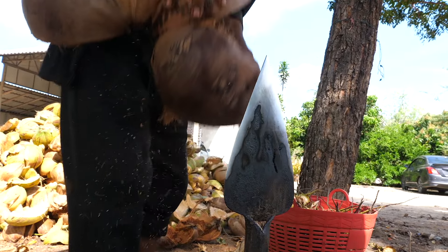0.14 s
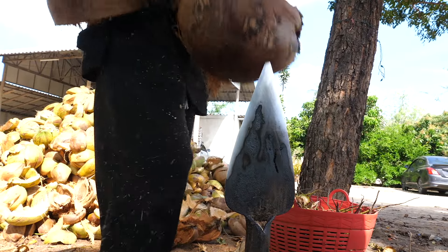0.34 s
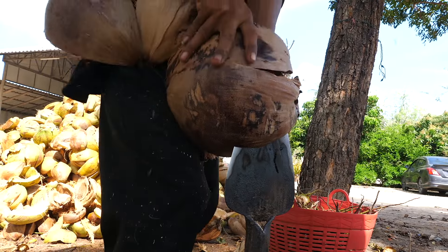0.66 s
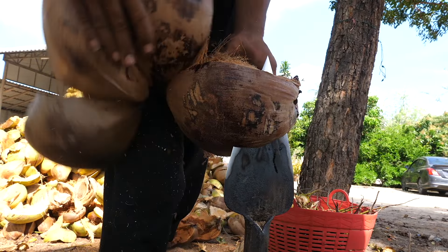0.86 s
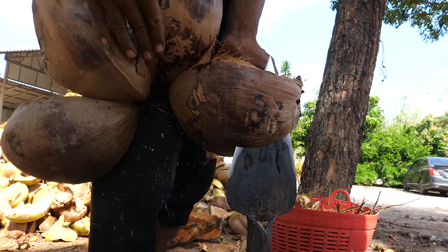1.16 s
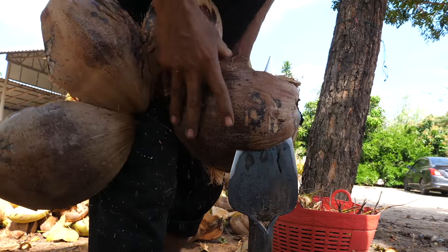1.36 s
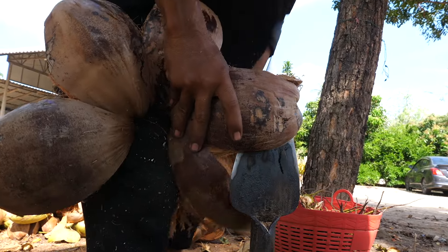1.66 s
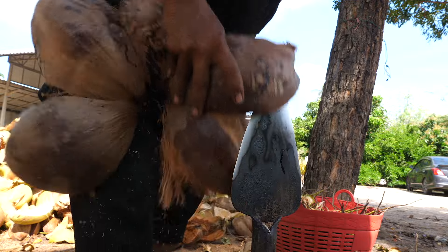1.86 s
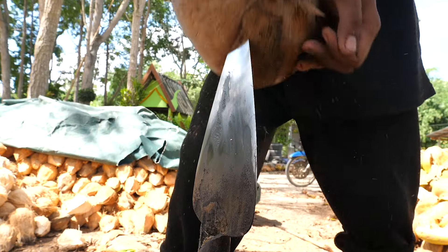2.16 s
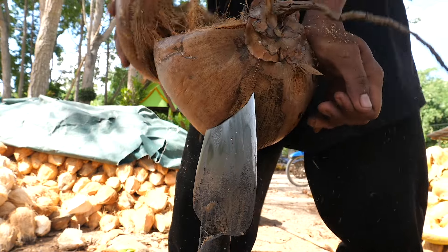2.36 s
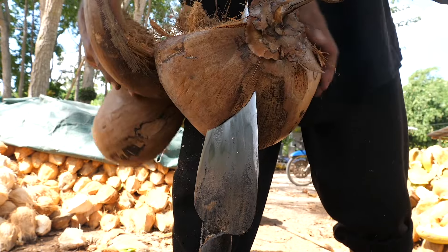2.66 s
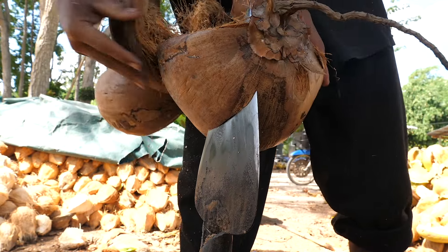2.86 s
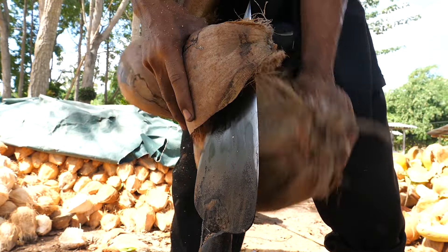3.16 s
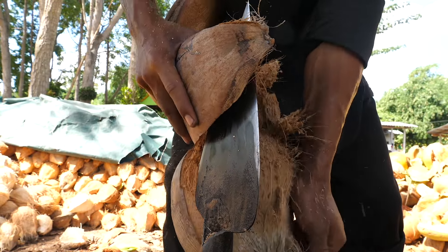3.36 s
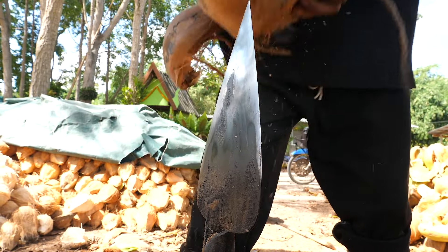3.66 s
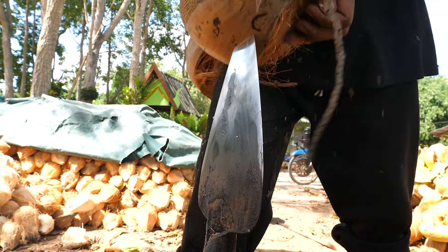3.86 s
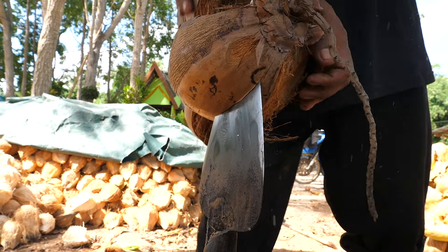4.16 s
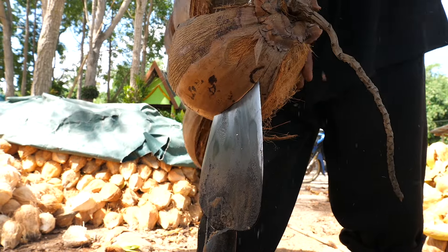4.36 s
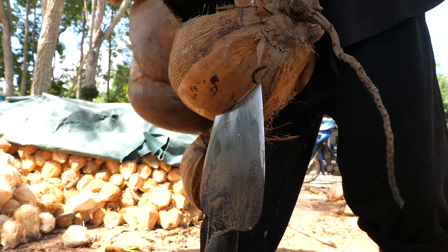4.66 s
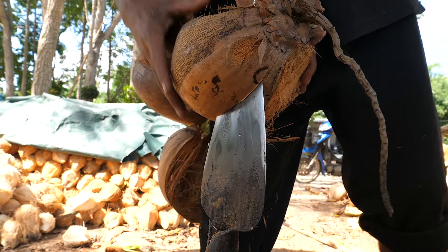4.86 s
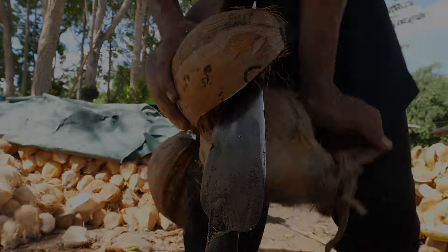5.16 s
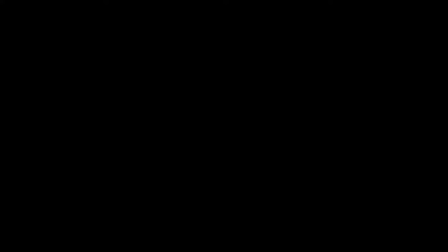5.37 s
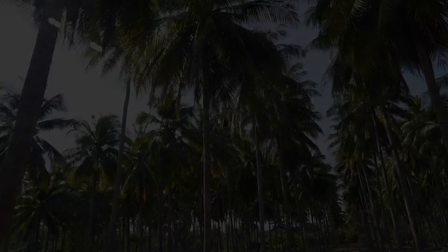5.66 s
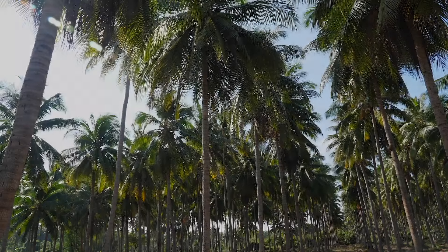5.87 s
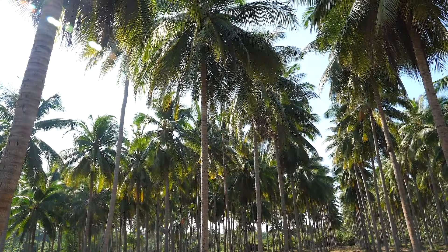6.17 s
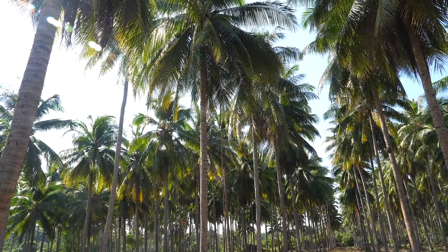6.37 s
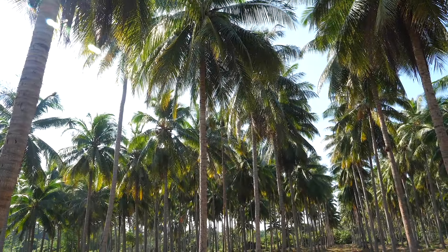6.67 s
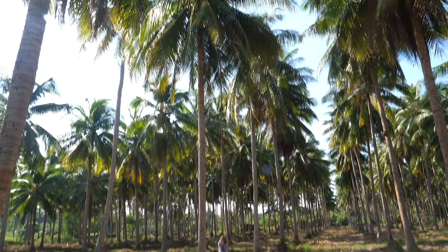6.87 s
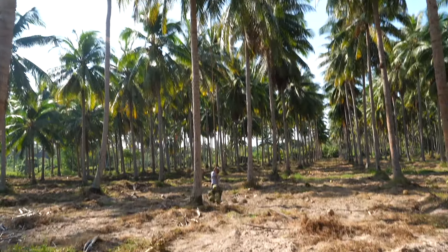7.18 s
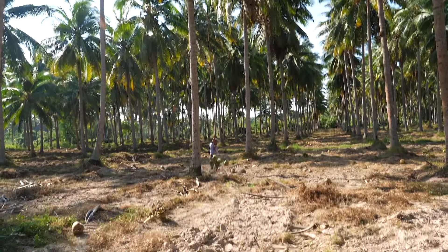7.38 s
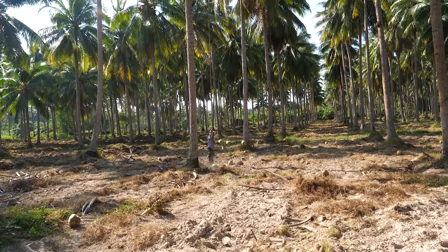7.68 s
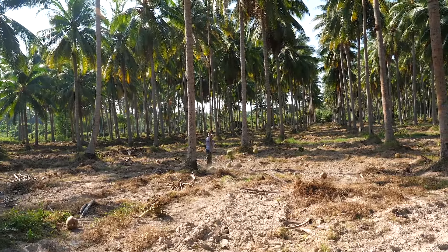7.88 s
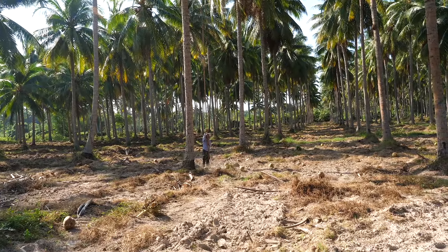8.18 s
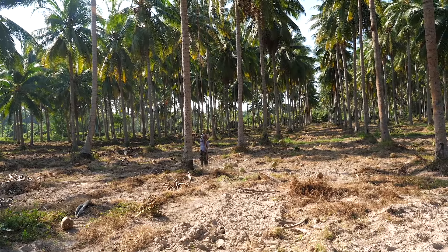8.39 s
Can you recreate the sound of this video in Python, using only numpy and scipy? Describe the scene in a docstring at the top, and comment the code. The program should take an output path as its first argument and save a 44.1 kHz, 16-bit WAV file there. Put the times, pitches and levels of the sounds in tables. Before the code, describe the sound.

Crunchy ripping and sharp snaps of coconut husking, a pause, then leafy rustle, stalk knocks and a heavy low thud on dry soil.

```python
"""Coconut husking and harvest

Coconuts are husked on an upright steel blade: crackling noise tears in strokes, bundles snap as short
resonant bursts, the nut bumps, and the blade rings in decaying sine modes between squeaks of wet husk.
Then, in a palm grove, a nut is pulled loose: filtered crackle rustles, struck stalks knock, airy tones sink
and damped low modes thud onto dry ground. Trunks scatter the sound back; rumble and breeze run throughout."""
import sys
import numpy as np
from scipy import signal
from scipy.fft import rfft, irfft, next_fast_len
from scipy.io import wavfile
from scipy.ndimage import uniform_filter1d, map_coordinates

SR = 44100
rng = np.random.default_rng(int(sys.argv[2]) if len(sys.argv) > 2 else 0)


def bounce(signal):
    """Save signal as a 16-bit WAV file at the path given by the first command-line argument."""
    frames = np.transpose(np.atleast_2d(signal))
    limited = np.clip(frames, -1, 1)
    pcm = np.round(limited * 32767).astype(np.int16)
    wavfile.write(sys.argv[1], SR, pcm)


N = 376168
TOP_HZ = 16000  # upper band limit
TIME = np.arange(N) / SR
SHORT = np.arange(SR // 4) / SR  # time axis of one short event, s


def amp(db):
    """Decibels to gain."""
    return 10 ** (np.asarray(db) / 20)


def unit(x):
    """Scaled to rms 1."""
    return x / np.sqrt(np.mean(x ** 2) + 1e-20)


def crest(x):
    """Scaled to peak 1."""
    return x / np.abs(x).max()


def fade(t60):
    """A decay that loses 60 dB in t60 seconds."""
    return np.exp(-np.log(1000) * SHORT / t60)


def along(points, hz):
    """Interpolates (f/Hz, value) points on a log frequency axis."""
    f, v = np.transpose(points)
    return np.interp(np.log(hz + 1), np.log(f + 1), v)


def gain(s, db):
    """Gain per sample along a level curve, -120 dB outside it."""
    return amp(np.interp(TIME, s, db, left=-120, right=-120))


def add(track, s, sound):
    """Mixes a sound into the track at s seconds."""
    part = track[round(s * SR):][:len(sound)]
    part += sound[:len(part)]


def wobble(rate):
    """A smooth random curve, rate knots a second."""
    knots = rng.standard_normal(int(N * rate / SR) + 4)
    return map_coordinates(knots, [TIME * rate])


def colour(x, spectrum):
    """Minimum-phase filter with the gain of (f/Hz, level/dB) points."""
    size = 4096
    level_db = np.maximum(along(spectrum, np.fft.rfftfreq(size, 1 / SR)), -100)
    cepstrum = irfft(np.log(amp(level_db)))
    # folding the cepstrum forward makes the filter causal
    cepstrum[1:size // 2] *= 2
    cepstrum[size // 2 + 1:] = 0
    response = irfft(np.exp(rfft(cepstrum)))
    return signal.oaconvolve(x, response)[:len(x)]


def band(x, lo_hz, hi_hz, order=2):
    """Causal band-pass."""
    edges = [lo_hz, min(hi_hz, TOP_HZ)]
    return signal.sosfilt(signal.butter(order, edges, "band", fs=SR, output="sos"), x)


def resonate(x, hz, q):
    """One resonance, at most half the band limit in pitch."""
    b, a = signal.iirpeak(min(hz, TOP_HZ / 2), max(q, 1), SR)
    return signal.lfilter(b, a, x)


def burst(t60):
    """Noise that dies away."""
    return rng.standard_normal(len(SHORT)) * fade(t60)


def crackle(rate, spread_db, patchy_db):
    """Tiny fractures of random size, rate a second; neighbours share a pitch, so colour shifts in patches."""
    size = rng.standard_normal(N) * amp(spread_db * rng.standard_normal(N))
    fractures = size * (rng.random(N) < rate / SR)
    z = signal.stft(fractures, nperseg=512)[2]
    field = uniform_filter1d(rng.standard_normal(z.shape), size=5, axis=0)
    field = uniform_filter1d(field, size=5, axis=1)
    return signal.istft(z * amp(patchy_db * unit(field)), nperseg=512)[1][:N]


def stroke(s, rise_s, hold_s, t60, swell_db=0):
    """Gain per sample of one push: it builds, holds while swelling or easing, and dies away."""
    out = np.zeros(N)
    t = np.arange(SR) / SR
    held = np.clip((t - rise_s) / hold_s, 0, 1)
    release = np.exp(-np.log(1000) * np.maximum(t - rise_s - hold_s, 0) / t60)
    add(out, max(s, 0), np.minimum(t / rise_s, 1) * amp(swell_db * held) * release)
    return out


# the air bed: t/s, rumble level/dB, breeze level/dB, microphone wind level/dB
AIR_LEVELS = [(0, -51.5, -52, -46), (5.4, -55, -51.5, -62), (5.8, -52, -45, -42.5), (7, -47.5, -58, -44.5),
              (8.53, -52.5, -53.5, -42.5)]
# spectrum of the low rumble: f/Hz, level/dB per Hz
RUMBLE_COLOUR = [(25, 0), (60, -5.5), (110, -1.5), (200, -6), (400, -12.5), (900, -29), (2000, -34)]
# spectrum of the breeze in the leaves: f/Hz, level/dB per Hz
BREEZE_COLOUR = [(240, -17), (400, -7.5), (460, -19), (528, -6), (753, -6.5), (9760, -15.5), (11400, -35),
                 (16000, -27)]


def outdoors():
    """Low rumble, a breeze in the leaves and slow wind pressure on the microphone, all filtered noise."""
    s, *levels = np.transpose(AIR_LEVELS)
    rumble_db, breeze_db, wind_db = [np.interp(TIME, s, db) for db in levels]
    rumble = unit(colour(rng.standard_normal(N), RUMBLE_COLOUR))
    breeze = unit(colour(rng.standard_normal(N), BREEZE_COLOUR))
    wind = unit(band(rng.standard_normal(N), 9.36, 12.0))
    rumble = amp(rumble_db + 3.4 * wobble(11.0)) * rumble
    breeze = amp(breeze_db + 0.25 * wobble(2.48)) * breeze
    return rumble + breeze + amp(wind_db) * wind


# the point drives into the husk: t/s, tearing level/dB before the range trims
BLADE_STABS = [(0.367, -25), (1.516, -47), (2.093, -24.5), (3.811, -23.5)]
STAB_RISE_S, STAB_HOLD_S, STAB_T60_S = 0.0024, 0.048, 0.29
STAB_COARSE_DB, STAB_FINE_DB = -9, -6  # coarse bundles and fine fibres, relative to the stab's tearing
# husk is levered off: t/s, rise/s, hold/s, tearing level/dB before the range trims,
# swell over the hold/dB, coarse bundles relative level/dB, fine fibres relative level/dB
HUSK_TEARS = [ (0.0, .02, 0.099, -35.5, 3, -7, -2.5), (0.485, 0.098, 0.11, -23.5, 1, -15, -0.5),
              (1.246, 0.024, 0.07, -22.5, -2, -11.5, -4.5), (1.527, 0.046, 0.024, -21, 1.5, -8.5, -1.5),
              (1.602, .02, 0.022, -23.5, 0, -4.5, -2.5), (1.648, 0.037, 0.081, -26.5, 1, -6, -7),
              (2.16, 0.093, 0.086, -24, 3, -16, -2), (2.392, 0.072, 0.1, -23.5, 1, -10.5, -4.5),
              (2.922, 0.029, 0.043, -23, 0, -14.5, 1), (3.004, 0.14, 0.12, -20, 0, -15, -4.5),
              (3.265, .015, 0.1, -26.5, 0.5, -5, -4), (3.421, .065, 0.069, -30.5, -7, -5.5, -6.5),
              (3.899, 0.078, 0.11, -27.5, 1.5, -13.5, 1.5), (4.369, 0.051, 0.2, -25.5, -0.5, -7, -3),
              (4.924, 0.057, 0.11, -19, 0, -13.5, -3), (5.101, .06, 0.14, -23.5, 0.5, -8.5, -8), ]
TEAR_T60_S = 0.076  # the last fibres let go


def effort():
    """How hard coarse, middling and fine fibres are torn by all the stabs and levering strokes."""
    pushes = []
    for s, db in BLADE_STABS:
        push = amp(db) * stroke(s, STAB_RISE_S, STAB_HOLD_S, STAB_T60_S)
        pushes.append((push, STAB_COARSE_DB, STAB_FINE_DB))
    for s, rise, hold, db, swell_db, coarse_db, fine_db in HUSK_TEARS:
        push = amp(db) * stroke(s, rise, hold, TEAR_T60_S, swell_db)
        pushes.append((push, coarse_db, fine_db))
    coarse = sum(push * amp(db) for push, db, _ in pushes)
    middle = sum(push for push, _, _ in pushes)
    fine = sum(push * amp(db) for push, _, db in pushes)
    catching = amp(1.45 * wobble(55))  # the husk holds and gives unevenly
    return catching * coarse, catching * middle, catching * fine


def plucks(count, centre_hz, cycles, spread_db):
    """Single stiff fibres part, each ringing briefly at its own pitch."""
    when = rng.random((count, 1))
    pitch = rng.standard_normal((count, 1))
    size = rng.random((count, 1))
    steps = np.arange(SR // 50)
    turns = np.minimum(centre_hz * np.exp(.75 * pitch), TOP_HZ) * steps / SR
    level = amp(spread_db * size ** 2 + 2 * pitch)
    grains = level * np.sin(2 * np.pi * turns) * np.exp(-turns / cycles)
    places = (when * N).astype(int) + steps
    return np.bincount(places.ravel(), grains.ravel(), N)[:N]


# spectrum of breaking husk: f/Hz, level/dB per Hz
HUSK_COLOUR = [(41, -79), (70, -42), (135, -5.5), (268, -10.5), (412, -2), (593, -7), (761, -2.5),
               (1580, -1.5), (2370, 1.5), (3490, 0.5), (6020, -7), (8860, -3), (10900, -17), (14000, -11.5),
               (16000, -27)]


def tearing():
    """Fibres give way in clumps: coarse bundles crunch low, fine hairs hiss, dry strands tick."""
    hairs = unit(colour(crackle(rate=18000, spread_db=2.0, patchy_db=2.8), HUSK_COLOUR))
    stiff = unit(band(plucks(count=3600, centre_hz=2500, cycles=6, spread_db=16), 600, 12000))
    strands = (rng.random(N) < 260 / SR) * rng.choice([-1, 1], N) * rng.uniform(.5, 1, N)
    ticks = unit(colour(strands, HUSK_COLOUR))
    fibres = (hairs + .6 * stiff + .48 * ticks) * amp(.9 * wobble(300))
    coarse, middle, fine = effort()
    # thickness sets the pitch of a breaking fibre; the three ranges overlap smoothly
    size = next_fast_len(N)
    hz, spectrum = np.fft.rfftfreq(size, 1 / SR), rfft(fibres, size)
    below = lambda edge_hz: irfft(spectrum / (1 + (hz / edge_hz) ** 6), size)[:N]
    low, upper = below(1064), below(5300)
    crunch = amp(-1.5) * coarse * unit(low)
    rip = amp(-3.0) * middle * unit(upper - low)
    hiss = amp(-1.5) * fine * unit(fibres - upper)
    return crunch + rip + hiss


# thick fibre bundles break: t/s, first crack peak level/dB, f/Hz (held to 8000 Hz), number of cracks
BUNDLE_SNAPS = [(.618, -6, 3480, 1), (.7495, -4.5, 1910, 1), (.7935, -6.5, 1920, 3), (0.861, -9.5, 2290, 1),
                (.867, -7, 3950, 2), (.886, -18, 3140, 1), (.8965, -5, 3140, 1), (.920, -6.5, 2120, 2),
                (.952, -8.5, 1690, 1), (1.122, -16.5, 3650, 1), (1.247, -20, 5300, 1),
                (1.2703, -2, 1480, 1), (1.273, -2.5, 3350, 1), (1.3163, 1.5, 1160, 1),
                (1.3995, -15.5, 1460, 2), (1.431, -18, 1640, 1), (1.5195, -10.5, 2000, 1),
                (1.5875, -1.5, 750, 1), (1.5965, -1.5, 1220, 1), (1.6295, -1, 1170, 1),
                (1.7275, -9, 880, 1), (2.4375, -8.5, 880, 2), (2.502, -8, 1410, 1), (2.996, 0.5, 720, 1),
                (3.0825, -4.5, 1380, 1), (3.2764, -12, 3740, 1), (3.393, -13.5, 3600, 1),
                (3.9255, -6.5, 8300, 1), (3.959, -2, 1800, 2), (4.391, -12.5, 8200, 2),
                (4.4227, -7, 1930, 1), (4.5235, -4, 1910, 1), (4.569, -6.5, 2420, 1),
                (4.6435, -8.5, 3100, 1), (4.966, -8, 2580, 1), (4.977, -2.5, 3800, 1)]
CRACK_GAP_S, CRACK_LOSS_DB = 0.0083, 2  # each further crack of a bundle comes this much later and weaker
# small snaps in every tear: mean peak relative to the tearing level, its random spread, median pitch
STRAY_COUNT, STRAY_DB, STRAY_SPREAD_DB, STRAY_HZ = 3, 10.5, 1.5, 2420


def breaks():
    """t/s, peak level/dB, f/Hz of every crack: thick bundles singly or in runs, thin ones at random in tears."""
    cracks = []
    for s, db, hz, count in BUNDLE_SNAPS:
        for k in range(round(count)):
            cracks.append((s + k * CRACK_GAP_S, db - k * CRACK_LOSS_DB, hz))
    for s, rise, hold, db, *_ in HUSK_TEARS:
        whens = rng.random(STRAY_COUNT)
        for when, (size, pitch) in zip(whens, rng.standard_normal((STRAY_COUNT, 2))):
            peak_db = db + STRAY_DB + STRAY_SPREAD_DB * size
            cracks.append((s + rise + when * hold, peak_db, STRAY_HZ * np.exp(.5 * pitch)))
    return cracks


def snaps():
    """A bundle breaks with a sharp noise crack and a brief resonance; louder breaks die away more slowly."""
    out = np.zeros(N)
    for s, db, hz in breaks():
        t60 = 0.0086 + 0.0065 * min(amp(db), 1)
        crack = crest(colour(band(burst(t60), 440, TOP_HZ), HUSK_COLOUR))
        ring = crest(resonate(burst(t60), hz, q=3.1))
        add(out, s, amp(db) * crest(crack + 0.8 * ring))
    return out


# the blade springing free: t/s, peak level/dB of the modal ring together with its noise burst
BLADE_RINGS = [(0.119, -10.5), (3.528, -24.5), (5.533, -19)]
# ringing modes of the steel: f/Hz, mean level/dB (each ring varies it), t60/s
STEEL_MODES = [(3066, -1.5, 0.095), (4170, -4, .09), (5170, -9, 0.079), (6030, -37, .07), (5950, -4, 0.13),
               (6288, -36, 0.12), (7750, 1, 0.046), (12800, -20, .06)]
# wet husk squeaking on steel: t/s of the middle, level/dB, mean slips a second, half length/s
HUSK_SQUEAKS = [(0.698, -11.5, 3640, 0.0056), (2.443, -44, 1900, 0.0011), (2.895, -44, 1700, 0.0039),
                (4.081, -17, 1040, 0.0063)]


def blade():
    """The steel rings in decaying modes as the husk lets go, and wet husk slips on it in short squeaks."""
    out = np.zeros(N)
    for s, db in BLADE_RINGS:
        ring = np.zeros(len(SHORT))
        for hz, level, t60 in STEEL_MODES:
            ring += amp(level + rng.normal(0, 3)) * fade(t60) * np.sin(2 * np.pi * hz * SHORT)
        noise = crest(band(burst(0.032), 240, 10500))
        add(out, s, amp(db) * crest(crest(ring) + 1.2 * noise))
    for s, db, slip_hz, half in HUSK_SQUEAKS:
        cycles = np.cumsum(slip_hz * (1 + .5 * rng.standard_normal(len(SHORT)))) / SR
        slips = band(np.diff(np.floor(cycles), prepend=0), 930, 6900)  # one pulse per slip
        add(out, s - 2 * half, amp(db) * unit(slips) * np.exp(-(SHORT / half - 2) ** 2))
    return out


# hands shift and rub on the husk: t/s of the middle, length/s, level/dB before the rub trim
HAND_GRIPS = [(0.825, 0.035, -32), (0.912, .07, -28.5), (1.104, 0.082, -41.5), (1.22, 0.076, -43.5),
              (1.93, 0.22, -41.5), (2.39, 0.036, -39), (2.648, 0.067, -41), (2.741, 0.08, -36.5),
              (2.91, 0.032, -39.5), (3.574, 0.033, -38), (3.642, 0.035, -41), (4.19, 0.14, -43),
              (4.355, .03, -37), (4.71, 0.024, -41.5), (5.385, 0.12, -46.5)]
# spectrum of the rubbing hands: f/Hz, level/dB per Hz
RUB_COLOUR = [(120, -44), (200, -30), (236, -39), (360, 1), (1080, -0.5), (3560, 1), (9060, -6.5),
              (16000, -18.5)]
# the hollow nut bumps on the blade and in the hands: t/s, knock peak level/dB, f/Hz
NUT_BUMPS = [(1.316, -5.5, 490), (1.64, -18.5, 503), (2.44, -16.5, 700), (2.995, -6.5, 634),
             (3.082, -19.5, 355), (3.483, -25, 420), (3.511, -32, 1320), (3.533, -23, 268),
             (4.52, -21, 223), (5.534, -24, 450)]
STAB_BUMP_DB, STAB_BUMP_HZ = -1, 236  # the nut's hollow answer, relative to the stab's tearing
# every bump also jolts the blade's post; level relative to the bump
THUMP_DB, THUMP_HZ, THUMP_T60_S = -23.5, 98, 0.055


def handling():
    """Hands rub and turn the nut; it bumps with a hollow knock and a low thump, also at every stab."""
    rub = unit(colour(crackle(rate=7000, spread_db=3.5, patchy_db=2.5), RUB_COLOUR))
    grip = sum(amp(db) / (1 + (2 * (TIME - s) / length) ** 4) for s, length, db in HAND_GRIPS)
    out = amp(-1.5) * rub * grip
    stab_bumps = [(s, db + STAB_BUMP_DB, STAB_BUMP_HZ) for s, db in BLADE_STABS]
    for s, db, hz in NUT_BUMPS + stab_bumps:
        knock = crest(band(resonate(burst(0.031), hz, q=1.57), 55, 1900))
        jolt = resonate(burst(THUMP_T60_S), THUMP_HZ, q=1)
        thump = crest(resonate(jolt, THUMP_HZ, q=1))
        add(out, s, amp(db) * (knock + amp(THUMP_DB) * thump))
    return out


# fronds and dry litter rustle: t/s, rise/s, hold/s, level/dB before the rustle trim
FROND_RUSTLES = [(5.698, 0.047, 0.082, -25.5), (6.064, 0.069, 0.057, -43.5), (6.338, .03, .03, -46),
                 (6.835, .01, 0.12, -49.5), (8.112, 0.028, 0.04, -39.5), (8.33, 0.022, 0.027, -48)]
RUSTLE_T60_S = 0.13
# spectrum of stiff leaves: f/Hz, level/dB per Hz
FROND_COLOUR = [(80, -47), (130, -13), (210, -17.5), (308, -5.5), (410, -12.5), (750, -10), (1900, -8.5),
                (3200, -13.5), (6000, -18), (9000, -16.5), (10800, -30.5), (15800, -30)]
# knocks on stalks and litter: t/s, peak level/dB, f/Hz, t60/s, leaf crackle level/dB relative to the stalk
STALK_KNOCKS = [(5.8, -8.5, 326, .083, 10.5), (6.205, -20.5, 2200, 0.092, -9.5),
                (6.318, -27, 1000, 0.15, -0.5), (6.365, -31, 7400, 0.16, -17),
                (6.8151, -10, 1850, 0.099, 9.5), (6.832, -17, 1500, 0.1, -6), (6.924, -32, 1400, 0.068, -2),
                (6.968, -27.5, 2080, 0.041, 9), (7.288, -17, 5800, 0.12, -3),
                (7.305, -3.5, 1070, 0.0077, 3.5), (7.3095, -3.5, 796, 0.026, 5),
                (7.34, -15, 1230, 0.034, -7), (7.715, -31, 1920, .046, -9), (8.137, -28.5, 1510, 0.19, -2),
                (8.197, -15.5, 1670, 0.057, -5), (8.349, -28.5, 1150, 0.043, -10)]


def fronds():
    """Stiff leaves rustle as coloured crackle; stalks and litter knock and crackle when struck."""
    shaking = sum(amp(db) * stroke(s, rise, hold, RUSTLE_T60_S) for s, rise, hold, db in FROND_RUSTLES)
    rustle = unit(colour(crackle(rate=14000, spread_db=2.0, patchy_db=1.8), FROND_COLOUR))
    out = amp(-1.0) * shaking * rustle
    for s, db, hz, t60, leaf_db in STALK_KNOCKS:
        stalk = crest(resonate(resonate(burst(t60), hz, q=1.0), hz, q=1.0))
        leaf = crest(colour(burst(t60), FROND_COLOUR))
        add(out, s, amp(db) * crest(stalk + amp(leaf_db) * leaf))
    return out


# thin airy whistles in the grove, one curve each: t/s, f/Hz, level/dB before the whistle trim
AIRY_WHISTLES = [
    [(6.33, 1540, -44), (6.43, 1740, -47.5), (6.7, 1735, -51.5), (6.82, 1690, -55)],
    [(6.52, 1650, -55), (6.58, 1440, -44), (6.67, 1120, -60)],
    [(6.83, 1500, -25), (6.93, 1200, -45), (7.15, 997, -59)],
    [(8.35, 1145, -47), (8.39, 777, -49), (8.44, 700, -56)],
]


def whistles():
    """Narrow, airy tones that waver and sink: random amplitudes on a gliding sine and cosine."""
    out = np.zeros(N)
    for rows in AIRY_WHISTLES:
        s, hz, db = np.transpose(rows)
        phase = 2 * np.pi * np.cumsum(np.interp(TIME, s, hz)) / SR
        tone = wobble(210) * np.sin(phase) + wobble(210) * np.cos(phase)
        out += amp(-3.0) * gain(s, db) * tone
    return out


# the nut landing and bouncing: t/s, level/dB of the swing's peak
NUT_THUDS = [(7.3031, 0.5), (7.339, -6.5), (8.2, -22)]
# damped modes of the ground: f/Hz, relative level/dB, t60/s
GROUND_MODES = [(111, 3, 0.093), (186, -2, 0.049), (274, 9.5, 0.019), (405, 6.5, 0.01)]


def landing():
    """The heavy nut drives a few low, damped swings into the soil, with a soft noise burst."""
    out = np.zeros(N)
    modes = sum(amp(level) * fade(t60) * np.sin(2 * np.pi * hz * SHORT) for hz, level, t60 in GROUND_MODES)
    swing = crest(band(modes, 89, 2800))
    for s, db in NUT_THUDS:
        add(out, s, amp(db) * (swing + 0.24 * crest(band(burst(0.065), 67, 510))))
    return out


def echo(x, t60s, build_s):
    """A diffuse noise tail that builds up; each frequency dies at its own speed."""
    hz, t, z = signal.stft(rng.standard_normal(SR * 3 // 2), SR, nperseg=256)
    decay = amp(-60 * t / along(t60s, hz)[:, None])
    tail = signal.istft(z * decay, SR, nperseg=256)[1]
    tail = tail * (1 - np.exp(-np.arange(len(tail)) / SR / build_s))
    return signal.fftconvolve(x, tail / np.linalg.norm(tail))[:N]


def scatter(x, t60s):
    """Countless trunks and leaves return the sound as smooth noise that dies away band by band."""
    hz, t, z = signal.stft(x, SR, nperseg=256)
    power = np.abs(uniform_filter1d(np.abs(z) ** 2, size=5, axis=0))
    # -120 in amp() is 60 dB of power; the tail builds over 30 ms
    tail = amp(-120 * t[:300] / along(t60s, hz)[:, None]) * np.minimum(t[:300] / .03, 1)
    tail = tail / tail.sum(1, keepdims=True)
    late = np.abs(signal.fftconvolve(power, tail, axes=1))[:, :len(t)]
    noise = signal.stft(rng.standard_normal(N), SR, nperseg=256)[2]
    return signal.istft(np.sqrt(late) * noise / noise.std(), SR, nperseg=256)[1][:N]


# decay of the husking yard: f/Hz, t60/s
YARD_DECAY = [(300, 0.072), (12000, 0.17)]
# decay of the palm grove: f/Hz, t60/s
GROVE_DECAY = [(100, 0.86), (400, 0.94), (1200, 1.28), (5000, 1.12), (14000, 0.72)]
# what the palms throw back: f/Hz, level/dB
FOLIAGE_COLOUR = [(200, -7), (900, -1), (2500, 0.5), (12000, 2.5)]


def scene():
    """The husking yard and the grove, each with its own echo, over the outdoor air."""
    husking = tearing() + snaps() + blade() + handling()
    leaves = fronds() + whistles()
    thud = landing()
    yard = husking + amp(-14.0) * echo(husking, YARD_DECAY, build_s=0.00044)
    leaf_echo = amp(-9.0) * scatter(colour(leaves, FOLIAGE_COLOUR), GROVE_DECAY)
    thud_echo = amp(-19.0) * echo(thud, GROVE_DECAY, build_s=0.018)
    grove = leaves + thud + leaf_echo + thud_echo
    return (yard + grove + outdoors())[None]


def record(dry):
    """The loudest peaks saturate; nothing passes above the band limit."""
    held = dry / (1 + np.abs(dry) ** 8) ** (1 / 8)
    size = next_fast_len(N + SR // 4)
    passed = np.fft.rfftfreq(size, 1 / SR) < TOP_HZ
    return irfft(rfft(held, size) * passed, size)[:, :N]


dry = scene()
out = record(dry)
bounce(out)
```